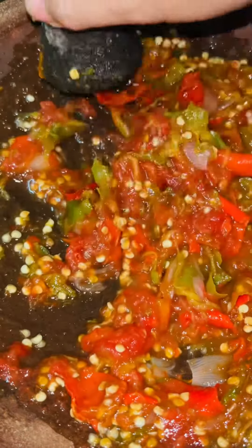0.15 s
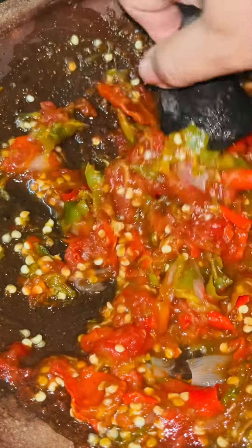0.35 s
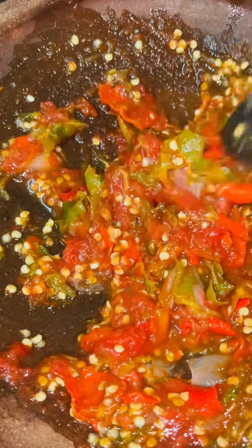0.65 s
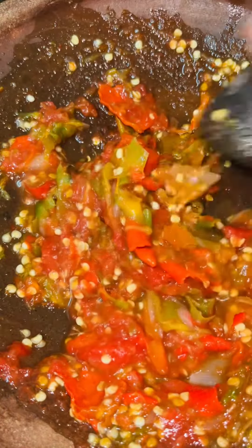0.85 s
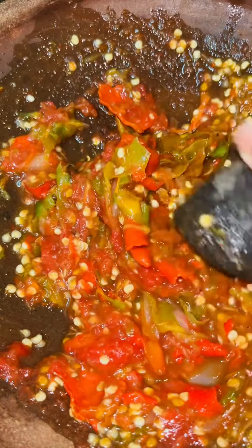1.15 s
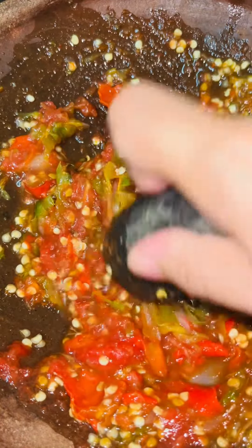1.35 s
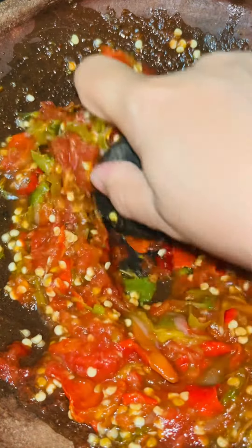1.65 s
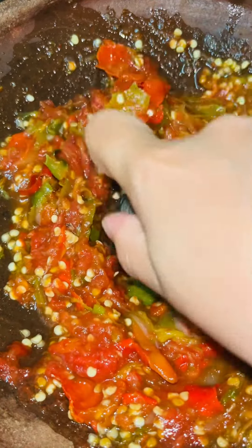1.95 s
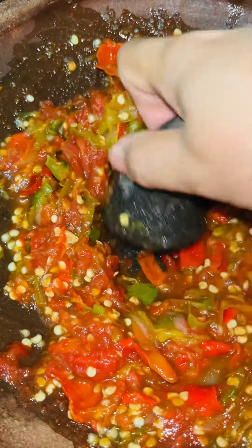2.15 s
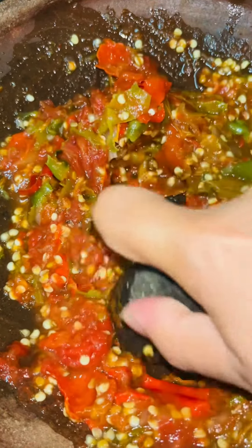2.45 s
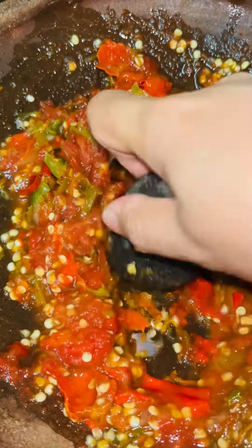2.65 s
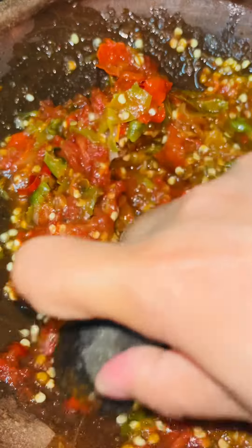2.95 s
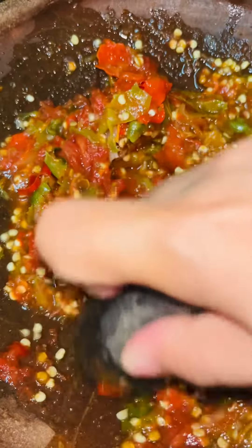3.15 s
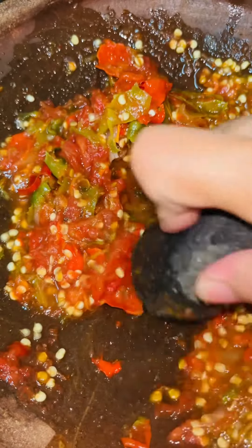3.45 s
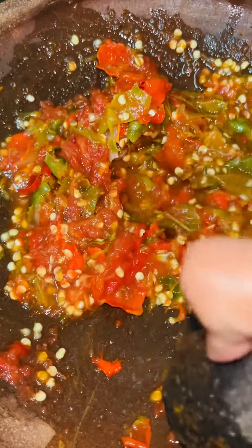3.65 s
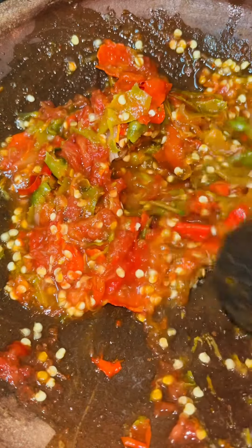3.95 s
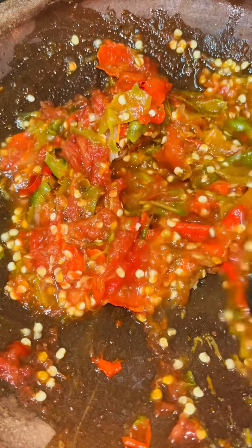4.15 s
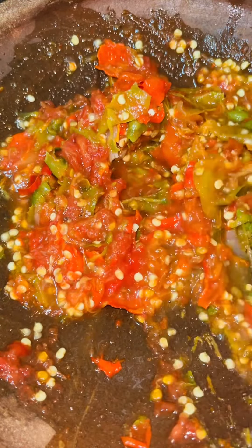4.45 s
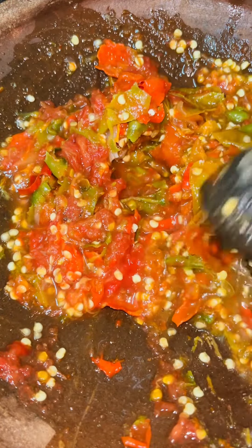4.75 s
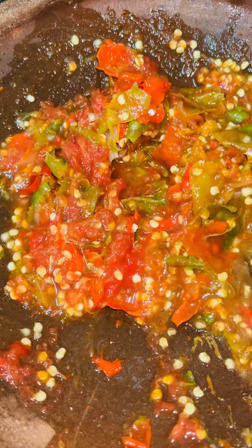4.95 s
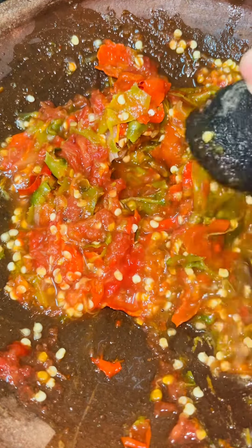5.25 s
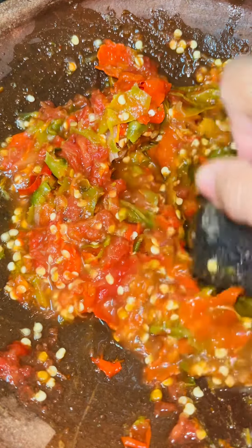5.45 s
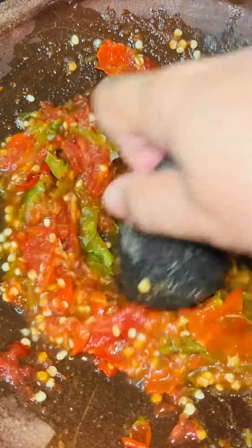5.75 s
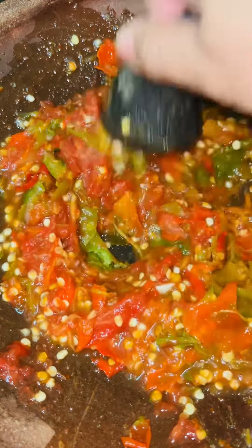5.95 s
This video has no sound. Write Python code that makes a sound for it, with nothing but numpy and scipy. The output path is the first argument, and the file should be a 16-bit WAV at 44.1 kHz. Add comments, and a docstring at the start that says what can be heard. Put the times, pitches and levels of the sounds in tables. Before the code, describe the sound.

A low wavering motor hum fills a small kitchen. Close to a phone microphone, a pestle presses wet pulp with crunchy squelches, sticky snaps and fizzing juice. Several blows make the stone bowl knock and briefly sing; the heavy mortar drops back with dull thuds. Between them come gentler smears, short squeaks and bright seed ticks. The last second is quieter, mostly light squishing and ticks with a short diffuse echo.

```python
"""A stone pestle pounds and grinds chillies and tomatoes in a stone mortar on a kitchen counter, close to a phone.
From the start an appliance hums in the small room, as wavering tones over shaped noise. Strokes then press the
pulp, whose clicks and bubbles fizz and squelch. Blows excite modes of counter, mortar and stone, and the bowl sings
on under the leaning pestle as wet pops snap. Soon squeezed pockets squeak by stick and slip, and the mortar drops
back in low thuds; later seeds crack as sharp pinging bursts. A diffuse echo follows the sounds in the mortar."""
import sys
import numpy as np
from scipy import signal
from scipy.fft import rfft, irfft, next_fast_len
from scipy.io import wavfile

SR = 44100
rng = np.random.default_rng(int(sys.argv[2]) if len(sys.argv) > 2 else 0)


def master_out(mix):
    """Clip the mix to full scale and print it as 16-bit PCM to the path in sys.argv[1]."""
    frames = np.transpose(np.atleast_2d(mix))
    ceiling = np.clip(frames, -1, 1)
    pcm = np.round(ceiling * 32767).astype(np.int16)
    wavfile.write(sys.argv[1], SR, pcm)


N = 268990
TIME = np.arange(N) / SR


def undb(db):
    """Logarithmic level: turn decibels into an amplitude gain."""
    return 10 ** (np.asarray(db) / 20)


def unit(x):
    """Normalisation: scale to an rms of 1."""
    return x / np.sqrt(np.mean(x ** 2))


def on_log_axis(points, hz):
    """Interpolation in log frequency: read (Hz, value) points as the ear spaces pitch."""
    f, value = np.transpose(points)
    return np.interp(np.log(np.maximum(hz, 1)), np.log(f), value)


def colour(x, points):
    """Minimum-phase filtering: a causal filter with the given (Hz, dB) response."""
    size = 2 * next_fast_len(x.shape[-1] // 2 + 2048)
    hz = np.fft.rfftfreq(size, 1 / SR)
    cepstrum = irfft(np.log(undb(on_log_axis(points, hz))))
    # folding the cepstrum onto positive time makes the filter causal
    cepstrum[1:size // 2] *= 2
    cepstrum[size // 2 + 1:] = 0
    response = np.exp(rfft(cepstrum))
    return irfft(rfft(x, size) * response)[..., :x.shape[-1]]


def band(x, hz, q):
    """Single resonance: a peak of sharpness q with gain 1 at its centre."""
    return signal.lfilter(*signal.iirpeak(hz, q, fs=SR), x)


def add(track, s, sound):
    """Superposition: mix a sound into a track at time s."""
    start = max(int(s * SR), 0)
    part = sound[:max(N - start, 0)]
    track[start:start + len(part)] += part


def wander(rate):
    """Random modulation: straight lines between random values, rate of them a second."""
    return np.interp(TIME * rate, np.arange(4096), rng.standard_normal(4096))


def ring(modes, swell_cycles, detune=0):
    """Modal response to a push: each mode takes some cycles to build up, so the lows come late."""
    t = TIME[:SR // 2]
    hz, db, t60 = np.transpose(modes)[:, :, None]
    hz = hz * (1 + detune * rng.standard_normal(hz.shape))
    swell = 1 - np.exp(-(hz * t / swell_cycles) ** 2)
    decay = undb(db - 60 * t / t60)
    return np.sum(decay * swell * np.sin(2 * np.pi * hz * t), axis=0)


def crackle(per_s, spread_db):
    """Random impulse process: dense clicks of either sign, mostly small with a few big ones."""
    present = rng.random(N) < per_s / SR
    size = undb(spread_db * np.minimum(rng.exponential(size=N), 4))
    return unit(present * size * rng.choice([-1, 1], N))


def bubbles(low_hz, high_hz, cycles, glide, spread_db, count):
    """Bubble resonance: tiny air pockets ring for a few cycles, rising in pitch as they burst."""
    out, t = np.zeros(N), TIME[:int(3 * cycles / low_hz * SR)]
    when, pitch, chance = rng.random((count, 3)).T[:, :, None]
    hz = low_hz * (high_hz / low_hz) ** pitch
    age = hz * t / cycles
    size = undb(-spread_db * np.log(np.maximum(chance, .02)))
    sound = size * np.exp(-age) * np.sin(2 * np.pi * hz * t * (1 + glide * np.minimum(age, 2)))
    for s, one in zip(when[:, 0] * N / SR, sound):
        add(out, s, one)
    return unit(out)


# Spectrum of the background noise. Each row: frequency in Hz, density in dB per Hz.
KITCHEN_NOISE = [(20, -100), (30, -112), (42, -70), (55, -60), (75, -62), (112, -60), (145, -71),
                 (245, -68), (320, -76), (490, -78), (660, -86.5), (1500, -95), (4800, -101.5),
                 (8000, -109), (13000, -113), (16000, -126)]
# Tones of the appliance. Each row: frequency in Hz, mean level in dB rms.
HUM_TONES = [(102.3, -43.5), (238, -54), (1960, -75.5)]


def kitchen():
    """Broadband and tonal noise: fan rumble and hiss, with the slightly wavering hum of a motor."""
    white = rng.standard_normal((2, N)) * np.sqrt(SR / 2)
    mid, side = colour(white, KITCHEN_NOISE)
    # the left-right difference is weak in the bass and in the high treble
    side = colour(side, [(100, -59), (400, -10.0), (1500, 0), (4000, -2.5), (7000, -26.0)])
    hum = np.zeros(N)
    for hz, db in HUM_TONES:
        level = undb(db + 1.3 * wander(rate=8.7)) * np.sqrt(2)
        hum += level * np.sin(2 * np.pi * hz * TIME + 0.092 * wander(rate=13))
    return mid + hum + side * np.array([[1], [-1]])


RELEASE_S = 0.0052  # decay constant of the pulp when the pressure lifts
SEEP_DB, SEEP_S = -5.5, 0.041  # the juice seeping back: level against full pressure, decay constant


def pressure(start, press_s, hold_s):
    """Loading and relaxation: the pestle presses in, holds and lifts; the juice seeps back."""
    age = TIME - start
    lifted = np.maximum(age - press_s - hold_s, 0)
    seep = undb(SEEP_DB)
    relaxation = (1 - seep) * np.exp(-lifted / RELEASE_S) + seep * np.exp(-lifted / SEEP_S)
    return np.clip(age / press_s, 0, 1) * relaxation


# Resonances of the space between pestle and bowl. Each row: frequency in Hz, lift in dB against the direct sound.
HOLLOW_MODES = [(1400, 1), (1680, 3), (2020, 4), (2490, 2), (2930, 7), (3710, 7), (4680, 5), (5180, 4)]
HOLLOW_Q = 28


def hollow(x):
    """Cavity resonance: the narrow hollow around the pestle lifts a few bands of what sounds in it."""
    return x + sum(undb(db) * band(x, hz, HOLLOW_Q) for hz, db in HOLLOW_MODES)


GRAINS_PER_S, GRAIN_SPREAD_DB = 150, 4  # spread either way
GRAIN_CYCLES = 9  # decay constant


def grit():
    """Granular fracture: bits of skin and seed give way, each ringing near one hollow resonance."""
    out, t = np.zeros(N), TIME[:SR // 40]
    pitches = np.transpose(HOLLOW_MODES)[0]
    draws = rng.random((int(GRAINS_PER_S * N / SR), 4))
    for k, (moment, which, size, detune) in enumerate(draws):
        hz = pitches[int(which * len(pitches))] * (.96 + .08 * detune)
        age = hz * t / GRAIN_CYCLES
        grain = (1 - np.exp(-4 * age)) * np.exp(-age) * np.sin(2 * np.pi * hz * t)
        size_db = GRAIN_SPREAD_DB * (2 * size - 1)
        add(out, (k + moment) / GRAINS_PER_S, undb(size_db) * grain)
    return unit(out)


# Strokes through the pulp. Each row: start in seconds, press-in in seconds, hold in seconds,
# relative juice fizz in dB, relative pulp squelch in dB.
STROKES = [(0.168, 0.11, 0.011, -46.5, -51.5), (0.504, 0.035, 0.093, -38, -32),
           (0.975, 0.0024, 0.072, -41, -36.5), (1.319, 0.065, 0.023, -54.5, -49),
           (1.55, 0.043, 0.05, -43.5, -37.5), (1.777, 0.0035, 0.033, -48, -40),
           (1.82, 0.0036, 0.023, -42, -34.5), (1.904, 0.083, 0.04, -43, -43.5),
           (2.091, 0.016, 0.009, -47.5, -58), (2.288, 0.02, 0.23, -56, -51.5),
           (2.466, 0.038, 0.062, -47.5, -45.5), (2.613, 0.034, 0.0071, -49.5, -66),
           (2.873, 0.043, 0.048, -38, -30.5), (3.257, 0.017, 0.095, -48, -47.5),
           (3.642, 0.041, 0.065, -44, -51), (3.891, 0.038, 0.031, -55.5, -81),
           (4.05, 0.094, 0.022, -43, -37.5), (4.296, 0.14, 0.16, -50, -57.5),
           (4.522, 0.082, 0.019, -43.5, -37), (4.958, 0.0028, 0.088, -39.5, -30.5),
           (5.177, 0.0057, 0.03, -50.5, -58), (5.255, 0.089, 0.026, -50, -54),
           (5.608, 0.021, 0.038, -53, -48.5)]
# Spectral shape of the fizzing juice. Each row: frequency in Hz, relative gain in dB.
FIZZ_SHAPE = [(1500, -9), (3000, 2), (4000, -1.5), (4500, 2.5), (5250, -1), (6200, 8), (8000, 2.5),
              (12000, 0), (16000, -5.5)]
# Spectral shape of the squelching flesh. Each row: frequency in Hz, relative gain in dB.
SQUELCH_SHAPE = [(150, 2.5), (330, 15), (600, -7), (800, 12), (1100, 6.5), (1700, -4), (2300, 3), (2900, 1),
                 (4000, -5), (8000, -70)]
GRAIN_DB = -5.5  # grit against the rest of the crushing


def pulp():
    """Random fracture and bubble noise: flesh tears, juice spurts, and the grinding drives the mortar."""
    gains = np.zeros((2, N))
    for start, press_s, hold_s, *levels in STROKES:
        gains += np.outer(undb(levels), pressure(start, press_s, hold_s))
    spurts = unit(undb(2.4 * wander(rate=260)))
    fizz_gain, squelch_gain = gains * spurts

    fine_bubbles = bubbles(low_hz=3020, high_hz=13920, cycles=29, glide=0.00986, spread_db=6.5, count=5000)
    fine = crackle(per_s=7000, spread_db=4.5) + undb(-11.5) * fine_bubbles
    fizz = undb(-4.5) * unit(hollow(colour(fine, FIZZ_SHAPE))) * fizz_gain

    tearing = crackle(per_s=1800, spread_db=3.5)
    pockets = bubbles(low_hz=1300, high_hz=5200, cycles=20, glide=0.03, spread_db=3, count=1100)
    short_bubbles = bubbles(low_hz=956, high_hz=4420, cycles=3.5, glide=0.05, spread_db=-0.5, count=2000)
    coarse = tearing + undb(-11.0) * pockets + undb(-9.5) * short_bubbles
    crush = unit(hollow(colour(coarse, SQUELCH_SHAPE))) + undb(GRAIN_DB) * grit()
    squelch = undb(-5) * unit(crush) * squelch_gain

    response = ring(MORTAR_MODES, swell_cycles=0.71)
    response = response / np.sqrt(np.sum(response ** 2))
    grinding = signal.fftconvolve(squelch, response)[:N]
    return fizz + squelch + undb(-11.5) * grinding


# Pestle blows. Each row: start in seconds, counter thump in dB, bowl rocking in dB, rim ring in dB,
# mortar knock in dB, knock pitch ratio of the low modes, stone clack in dB, delay of the first-slip unit
# in seconds, slip strength in dB; the levels scale relative modes.
BLOWS = [(0.228, -27.5, -38, -53, -46, 1, -63, 0.064, -12), (0.27, -26, -46, -39, -30, 1, -64, 0.059, -8.5),
         (0.51, -29.5, -26, -20, -17.5, 1.11, -13.5, 0.05, 1.5),
         (0.974, -16.5, -4, -18, -8.5, 1.02, -23, 0.046, -11.5),
         (1.395, -27, -40, -46, -48, 1, -70, 0.043, -9),
         (1.832, -29.5, -49, -45, -47, 0.64, -44, 0.089, -22),
         (2.324, -26.5, -30.5, -65, -41.5, 1.07, -70, 0.08, -8.5),
         (2.518, -33, -33, -40, -40, 1, -60, 0.066, -21),
         (2.8613, -20.5, -9, -17, -14, 1.13, 2, 0.05, -5.5),
         (3.216, -22, -16.5, -52, -35, 0.95, -63, 0.052, -6.5),
         (3.668, -24, -19.5, -51, -35.5, 0.96, -72, 0.046, -16.5),
         (4.0465, -26.5, -6.5, -20.5, -19, 1.01, -24, 0.053, 1.5),
         (4.5397, -24, -9, -30.5, -15, 0.97, -38, 0.043, -6),
         (4.9617, -17.5, -7.5, -19.5, -12, 1.06, -19.5, 0.057, -5.5)]
# After-slips of a blow. Each row: delay in first-slip units, change of thump in dB, of knock in dB, of clack in dB.
SLIPS = [(0.999, 1.5, -11.5, -21), (1.699, 1.5, -13.5, -52)]
# Modes of the counter under the mortar. Each row: mean frequency in Hz, relative level in dB, t60 in seconds.
COUNTER_MODES = [(63.2, -5.5, 0.44), (100.2, -4, 0.258), (126.8, 12, 0.1), (153.2, -1, 0.2),
                 (172.3, 2.5, 0.13)]
# Modes of the mortar, damped by the pulp. Each row: nominal frequency in Hz, relative level in dB, t60 in seconds.
MORTAR_MODES = [(415, -3.5, 0.085), (463.5, 14.5, 0.031), (491.7, -9, 0.13), (559, -7.5, 0.059),
                (736, 1, 0.024), (1152, 1, 0.0053), (1062, -27, .11), (1415, -24, .09), (2015, -33, .15),
                (2560, -33, .2), ]
# Modes of stone on stone. Each row: mean frequency in Hz, relative level in dB, t60 in seconds.
STONE_MODES = [(852, -25, 0.05), (1226, 5, 0.015), (1456, 2, 0.014), (1650, -9, 0.0093), (1730, -27, 0.14),
               (2040, -11, 0.012), (2150, 0, 0.0046), (2557, -13.5, 0.022), (3280, -27, .02),
               (3850, -26, 0.01), ]
CUSHION_S = .0025  # the pulp cushions a blow, so the mortar answers this much later


def pestle():
    """Impact excitation of modes: each blow lands on another spot and rings anew; two slips follow it."""
    out = np.zeros(N)
    for s, thump_db, _, _, knock_db, pitch, clack_db, slip_s, slip_db in BLOWS:
        levels = [thump_db, knock_db, clack_db]
        counter = ring(COUNTER_MODES, swell_cycles=1.7, detune=0.041)
        # the pulp under the pestle retunes only the low, damped modes
        retuned = [(hz * pitch if hz < 848 else hz, db, t60) for hz, db, t60 in MORTAR_MODES]
        mortar = ring(retuned, swell_cycles=2.98, detune=0.01)
        t = TIME[:len(mortar)]
        mortar = np.interp(t - CUSHION_S, t, mortar)
        stone = ring(STONE_MODES, swell_cycles=3.04, detune=0.012)
        bodies = np.array([counter, mortar, stone])
        add(out, s, undb(levels) @ bodies)
        for delay, *change in SLIPS:
            slip_levels = np.add(levels, change) + slip_db
            add(out, s + delay * slip_s, undb(slip_levels) @ bodies)
    return out


# The bowl's notes, rocking on its foot and ringing at its rim. Each row: mean frequency in Hz, rise in seconds,
# t60 after a blow in seconds, share of a lean's ring-out time, relative pitch waver, chatter of the pestle in dB.
BOWL_NOTES = [(238.4, 0.016, 0.15, 0.94, 0.03, 1.1), (1060, 0.002, 0.05, 0.28, 0.03, 3), ]
# Leans of the pestle that keep the bowl sounding. Each row: peak in seconds, swell in seconds,
# ring-out t60 in seconds before the note's share, rocking in dB, rim in dB.
LEANS = [(0.592, 0.022, 0.32, -27.5, -37.5), (1.072, 0.022, 0.16, -25, -46),
         (2.933, 0.035, 0.095, -22.5, -29.5), (3.328, 0.019, 0.19, -32.5, -66),
         (3.724, 0.056, 0.071, -39.5, -54), (4.107, 0.016, 0.14, -28, -34),
         (4.137, 0.012, 0.3, -25.5, -31.5), (4.163, 0.0075, 0.17, -42, -46), (4.634, 0.043, 0.25, -24, -65),
         (5.015, 0.011, 0.25, -36, -27), (5.048, 0.013, 0.17, -29, -34), (5.085, 0.016, 0.22, -36.5, -55)]
EASE_S = 0.01  # the hand eases off over this time


def bowl():
    """Sustained resonance: blows start two notes, the leaning pestle feeds them in step, they ring out."""
    out, t = np.zeros(N), TIME[:SR // 2]
    lead_s = .15  # room for the swell before a lean's peak
    age = t - lead_s
    for k, (hz, rise_s, t60, ring_share, waver, chatter_db) in enumerate(BOWL_NOTES):
        level = np.zeros(N)
        for s, _, *note_db in BLOWS:
            rise = 1 - np.exp(-(t / rise_s) ** 2)
            add(level, s, undb(note_db[k] - 60 * t / t60) * rise)
        for s, swell_s, ring_s, *note_db in LEANS:
            eased_age = np.hypot(age, EASE_S) - EASE_S
            fading = undb(-60 * eased_age / (ring_s * ring_share))
            swell = np.exp(-(age / swell_s) ** 2)
            add(level, s - lead_s, undb(note_db[k]) * np.where(age < 0, swell, fading))
        pitch = hz * (1 + waver * wander(rate=90))
        chatter = undb(chatter_db * wander(rate=130))
        out += level * chatter * np.sin(2 * np.pi * np.cumsum(pitch) / SR)
    return out


# small pops within a stroke: snap against its fizz, body against its squelch, spread either way
STRAY_SNAP_DB, STRAY_BODY_DB, STRAY_SPREAD_DB = -4, -10, 3


def stray_pops(count):
    """Random film rupture: small pops at random moments of each stroke, stronger in louder strokes."""
    rows = []
    for start, press_s, hold_s, fizz_db, squelch_db in STROKES:
        for moment, pitch, size in rng.random((count, 3)):
            size_db = STRAY_SPREAD_DB * (2 * size - 1)
            s = start + press_s / 2 + moment * (press_s / 2 + hold_s + RELEASE_S)
            snap_db = fizz_db + STRAY_SNAP_DB + size_db
            body_db = squelch_db + STRAY_BODY_DB + size_db
            rows.append((s, snap_db, body_db, 3000 * 4 ** pitch))
    return rows


SPLAT_SNAP_DB, SPLAT_BODY_DB = -27.5, -13  # relative to the knock of the blow
SPLAT_HZ = 2555  # air trapped under the pestle


def splats():
    """Impact on a wet surface: each blow slaps the pulp as it lands."""
    return [(s, knock_db + SPLAT_SNAP_DB, knock_db + SPLAT_BODY_DB, SPLAT_HZ)
            for s, _, _, _, knock_db, *_ in BLOWS]


# Loud wet pops of skins and suction. Each row: start in seconds, relative snap in dB, relative body in dB, ping in Hz.
POPS = [(0.289, -38.5, -64, 10800), (0.5104, -37.5, -29, 3600), (0.525, -50, -21, 7700),
        (0.544, -52, -33, 1400), (0.597, -32, -33, 3980), (0.6103, -37, -47, 4500), (0.614, -35, -38, 2500),
        (0.633, -29.5, -19.5, 4000), (0.992, -36, -28, 3700), (1.0255, -38, -41, 1770),
        (1.059, -39, -25.5, 6300), (1.359, -65, -44, 7500), (1.6302, -50, -39, 7500),
        (1.652, -47, -32, 2000), (1.7975, -44, -42, 2150), (1.8213, -35, -31, 3330),
        (1.988, -42.5, -53, 7650), (2.034, -38, -50, 6700), (2.5097, -31.5, -29.5, 6050),
        (2.662, -42, -30, 6000), (4.4145, -52, -38, 4000), (4.439, -51, -45, 3560), (4.535, -49, -42, 5000),
        (4.577, -39, -30, 5040), (4.6118, -32.5, -22.5, 2820), (4.6258, -28, -24.5, 3100),
        (4.9945, -43, -22, 8000), (5.0466, -41, -21.5, 1480), (5.222, -46, -48, 4170),
        (5.334, -45, -44, 2980), (5.6193, -50, -49, 4600), (5.1965, -41, -40, 4400),
        (5.9343, -41, -33, 5200), (5.935, -40, -40, 1200), ]
# Spectral shape of a snap. Each row: frequency in Hz, relative gain in dB.
SNAP_SHAPE = [(300, -26), (1500, -12), (4000, -9.5), (9000, -12.5), (16000, -13)]


def pops():
    """Film rupture: a snap of juice is a short burst, its air pocket's ping and a body in the hollow."""
    out, t = np.zeros(N), TIME[:SR // 30]
    burst = np.exp(-t / 0.0014) * (1 - np.exp(-t / 0.0005))
    for s, snap_db, body_db, hz in POPS + splats() + stray_pops(count=2):
        fine, coarse = rng.standard_normal((2, len(t))) * burst
        ping = band(fine, hz, q=9)
        snap = unit(colour(fine, SNAP_SHAPE)) + undb(4.0) * unit(ping)
        broad = band(band(coarse, 1200, q=0.7), 2000, q=0.7)
        body = unit(hollow(broad))
        add(out, s, undb(snap_db - 17.5) * snap + undb(body_db - 21.5) * body)
    return out


# Rubbing that excites one pocket of pulp or one note of the bowl. Each row: peak in seconds,
# half length to 1/e in seconds, level in dB, frequency in Hz, sharpness Q.
SQUEEZES = [(0.576, 0.0079, -36, 2470, 24), (0.577, 0.0068, -31.5, 1480, 4), (1.022, 0.033, -30, 446.5, 33),
            (1.039, 0.0079, -35, 2930, 11), (1.767, 0.019, -50, 2000, 9), (1.781, 0.003, -37.5, 2010, 20),
            (1.832, 0.011, -34.5, 5040, 28), (1.834, 0.011, -31, 1870, 12), (1.833, 0.011, -35, 1130, 7),
            (1.839, .007, -39, 3100, 16), (1.8405, 0.004, -27.5, 5200, 22),
            (4.052, 0.0062, -40.5, 2020, 8.7), (4.067, 0.0065, -45.5, 2200, 24),
            (4.119, 0.0075, -43, 2000, 26), (4.15, .012, -44.5, 1520, 6.5), (4.595, 0.021, -45, 1780, 4.8),
            (4.597, 0.047, -45, 3680, 27), (2.862, 0.0025, -25.5, 604, 4.5), (2.917, 0.054, -40, 1250, 20),
            (2.942, 0.037, -48, 4600, 4.5), (3.3, 0.0054, -43, 1160, 8.5), (4.157, 0.015, -39, 3020, 6),
            (4.583, 0.017, -45.5, 4800, 34), (4.593, 0.013, -28.5, 485, 25), (4.626, 0.014, -28.5, 436, 24),
            (4.62, 0.0062, -41, 3470, 11), (5.207, 0.0051, -46.5, 3900, 3.9)]


def squeezes():
    """Stick-slip friction: random slips drive one resonance, which swells and dies briefly."""
    out = np.zeros(N)
    t = TIME[:SR // 5] - .1
    slips = crackle(per_s=4500, spread_db=1.0)
    for s, half_s, db, hz, q in SQUEEZES:
        swell = np.exp(-(t / half_s) ** 2)
        first = int(s * SR)
        rub = band(slips[first:first + len(t)] * swell, hz, q)
        add(out, s + t[0], undb(db) * unit(rub) * np.sqrt(np.mean(swell ** 2)))
    return out


# The heavy mortar tips and drops back on the counter. Each row: peak in seconds, level in dB, frequency in Hz.
THUDS = [(0.606, -24, 137), (3.249, -23, 105), (3.298, -26, 99), (3.335, -25.5, 136), (3.678, -17.5, 106),
         (3.729, -20, 99), (4.114, -36, 110), (4.171, -24, 106), (4.975, -14.5, 153)]
THUD_HALF_S = 0.0074  # from the peak to 1/e


def thuds():
    """Heavily damped oscillation: each drop pushes the counter through a few slow swings."""
    out = np.zeros(N)
    t = TIME[:SR // 10] - .05
    for s, db, hz in THUDS:
        push = np.exp(-(t / THUD_HALF_S) ** 2)
        add(out, s + t[0], undb(db) * push * np.sin(2 * np.pi * hz * t))
    return out


# Seeds cracking between the stones. Each row: start in seconds, relative level in dB, ping in Hz.
TICKS = [(1.3458, -39, 11600), (1.439, -47, 11900), (1.602, -39, 12000), (1.605, -29, 8100),
         (1.635, -40, 7400), (1.7753, -42, 7800), (1.788, -44, 7800), (1.8742, -35, 5200),
         (1.9535, -34, 9300), (1.9707, -43, 7500), (2.0155, -44, 7950), (2.1102, -38, 8700),
         (2.306, -41, 8150), (2.3128, -33, 7540), (2.6022, -32.5, 5600), (2.6626, -51, 6670),
         (3.075, -46, 7900), (3.656, -33, 14200), (5.1769, -43, 8100), (5.2834, -50, 12000),
         (5.297, -48, 8100), (5.4012, -46, 11500), (5.4043, -44, 11300), (5.4863, -54, 11500),
         (6.0087, -47, 12500), (5.6161, -37, 7700), (5.6196, -26, 7200), (5.621, -26.5, 8400),
         (5.9377, -37, 10500), ]
# Spectral shape of a dry crack. Each row: frequency in Hz, relative gain in dB.
SEED_SHAPE = [(500, -13), (2000, -10.5), (5000, 5.5), (9000, 3), (16000, -4)]
TICK_S = .00065  # decay constant of a crack
TICK_WALL_S, TICK_WALL_DB = 0.022, -16.5  # the nearest wall throws it back once


def ticks():
    """Brittle fracture: a seed breaks in one instant and its shell pings for a few cycles."""
    out, t = np.zeros(N), TIME[:SR // 30]
    for s, db, hz in TICKS:
        crack = colour(rng.standard_normal(len(t)) * np.exp(-t / TICK_S), SEED_SHAPE)
        ping = np.sin(2 * np.pi * hz * t) * np.exp(-hz * t / 5.5)
        tick = undb(db - 16.5) * unit(unit(crack) + undb(-2.0) * unit(ping))
        add(out, s, tick)
        add(out, s + TICK_WALL_S, undb(TICK_WALL_DB) * tick)
    return out


def spread(x, share):
    """Level panning: each spurt comes from another spot in the bowl, nearer to one port or the other."""
    return x * (1 + share * wander(rate=130) * np.array([[1], [-1]]))


def room(x, wet_db, t60_s, treble_t60_s, gap_s):
    """Diffuse reverberation: hard walls return a two-sided tail that dies sooner in the treble."""
    t = TIME[:SR // 2]
    noise = rng.standard_normal((2, len(t)))
    low = signal.sosfilt(signal.butter(2, 2500, fs=SR, output="sos"), noise)
    low_tail = low * undb(-60 * t / t60_s)
    treble_tail = (noise - low) * undb(-60 * t / treble_t60_s)
    tail = (low_tail + treble_tail) * (t > gap_s)
    tail = signal.sosfilt(signal.butter(4, 12500, fs=SR, output="sos"), tail)
    tail *= undb(wet_db) / np.sqrt(np.sum(tail ** 2) / 2)
    # long waves reach both ports alike
    shared = signal.sosfilt(signal.butter(1, 600, fs=SR, output="sos"), tail[0] - tail[1])
    tail[1] += shared
    return signal.fftconvolve(x[None], tail, axes=1)[:, :N]


def scene():
    """Direct and reverberant sound: the bowl beams seed ticks up at the phone, so fewer reach the walls."""
    background = kitchen()
    squish = pulp() + squeezes() + pops()
    knocks = pestle() + bowl()
    seeds = ticks()
    to_walls = undb(2) * knocks + squish + undb(-3.5) * seeds
    echo = room(to_walls, wet_db=-15.5, t60_s=0.38, treble_t60_s=0.29, gap_s=0.0025)
    return knocks + thuds() + spread(squish + seeds, share=0.056) + echo + background


# Phase between the two microphone ports. Each row: frequency in Hz, lead of the left in radians.
PORT_PHASE = [(0, 0), (100, -.15), (240, -.4), (480, -1), (750, -1.2), (1100, -.6), (1500, 0), (2800, 2.1),
              (3400, 1.3), (4500, .6), (5200, 1.1), (5750, 2.9), (6300, 3.4), (7600, 5.9), (8700, 6.9),
              (10000, 9.2), (10800, 9.8), (11900, 12.3), (13100, 12.9), (14100, 15.3), (16000, 16.6)]
# Level between the two ports. Each row: frequency in Hz, left minus right in dB.
PORT_BALANCE = [(60, -.5), (240, -2.5), (600, -4), (950, 0), (1400, -2), (2600, -3.5), (3700, 0),
                (4500, -3), (5500, 0), (15000, 0)]
TOP_HZ = 15900


def record(dry):
    """Two-port reception: phase and level differ between ports with frequency; the top is cut off."""
    size = 2 * next_fast_len(N // 2 + 2048)
    hz = np.fft.rfftfreq(size, 1 / SR)
    lead = np.interp(hz, *np.transpose(PORT_PHASE))
    balance = undb(on_log_axis(PORT_BALANCE, hz) * np.array([[1], [-1]]) / 2)
    lag = np.exp(-1j * lead * np.array([[0], [1]]))  # on the right only
    heard = irfft(rfft(dry, size) * balance * lag)[:, :N]
    return signal.sosfilt(signal.ellip(8, .2, 80, TOP_HZ, fs=SR, output="sos"), heard)


dry = scene()
out = record(dry)
master_out(out)
```